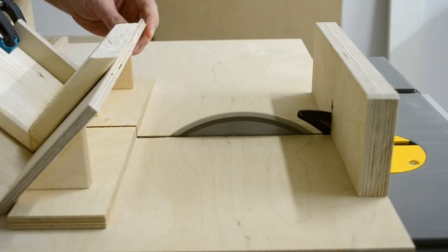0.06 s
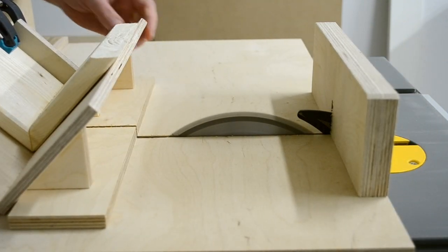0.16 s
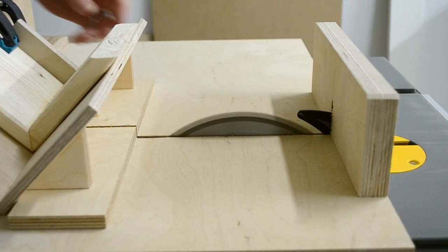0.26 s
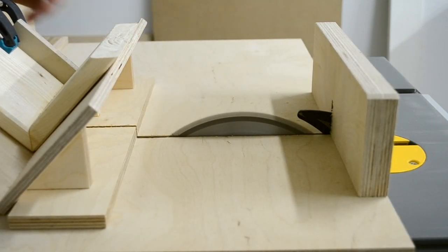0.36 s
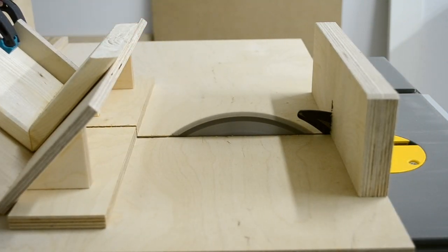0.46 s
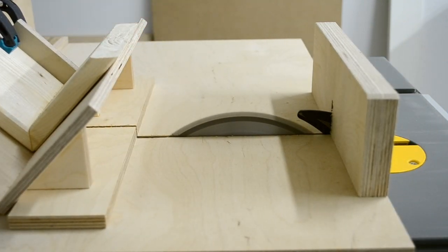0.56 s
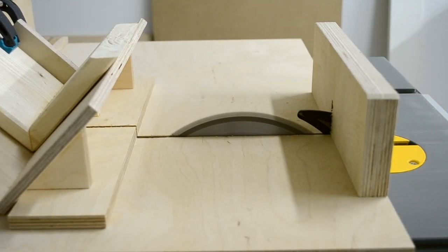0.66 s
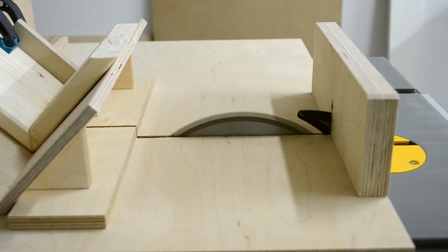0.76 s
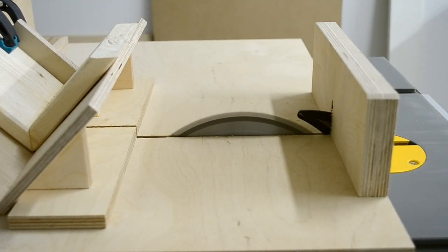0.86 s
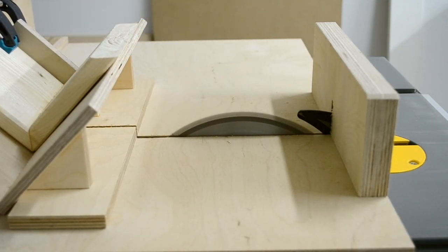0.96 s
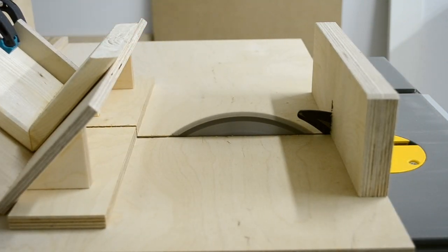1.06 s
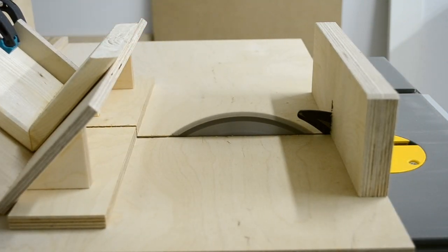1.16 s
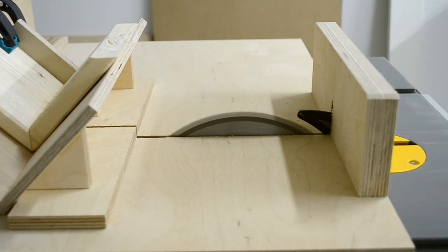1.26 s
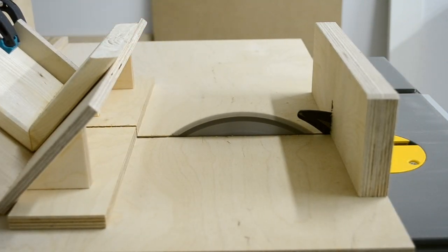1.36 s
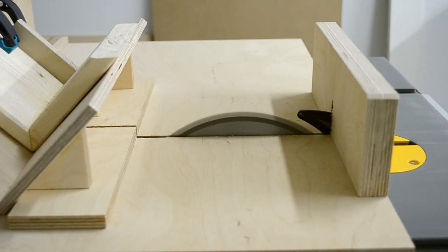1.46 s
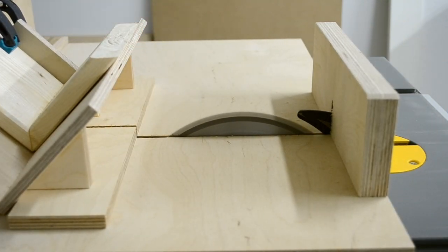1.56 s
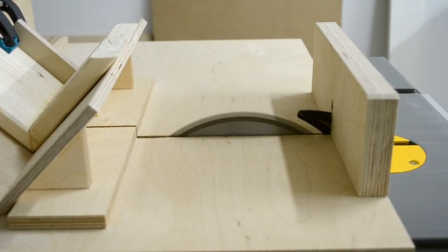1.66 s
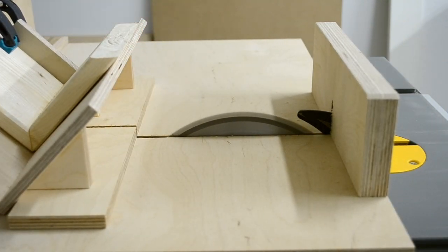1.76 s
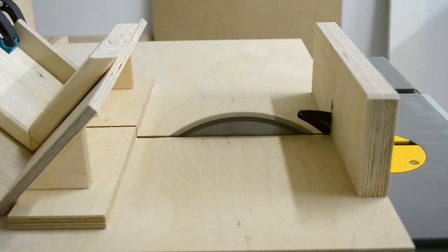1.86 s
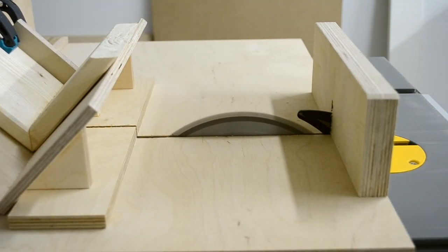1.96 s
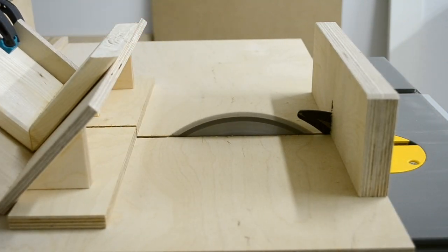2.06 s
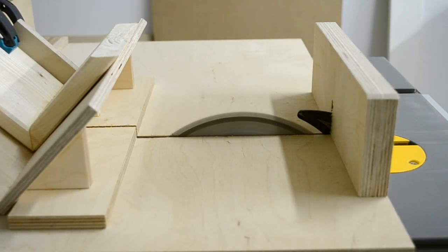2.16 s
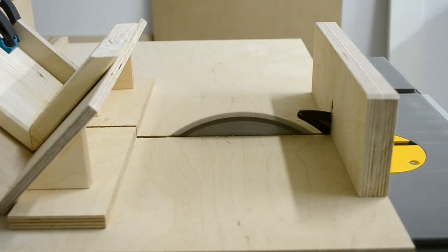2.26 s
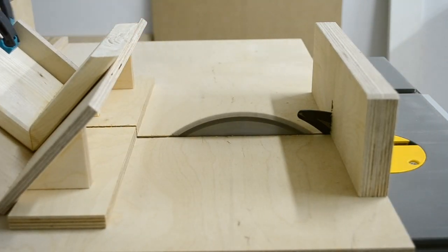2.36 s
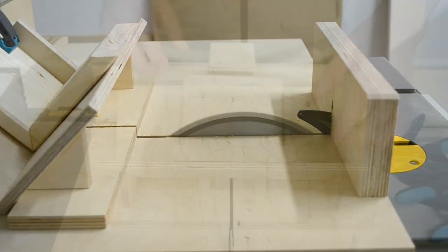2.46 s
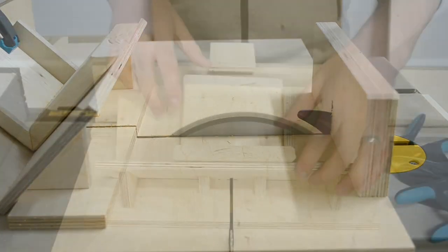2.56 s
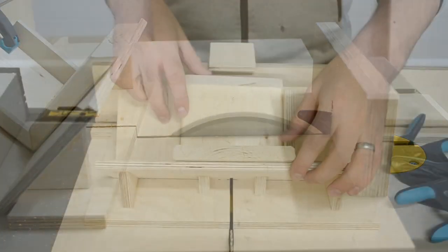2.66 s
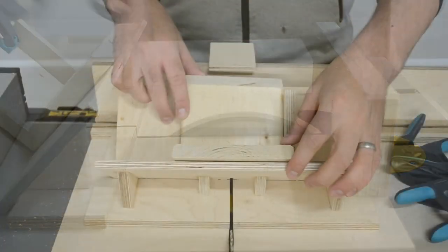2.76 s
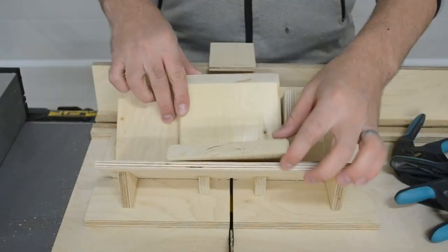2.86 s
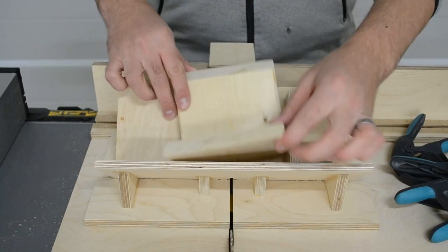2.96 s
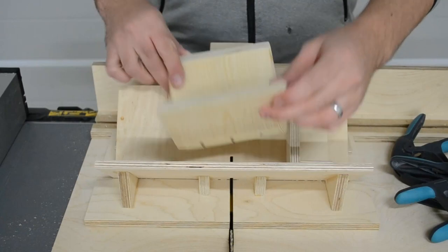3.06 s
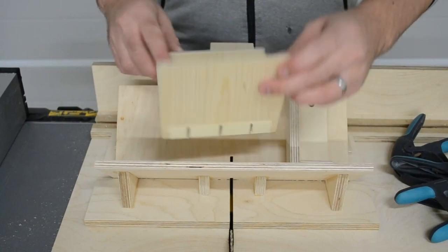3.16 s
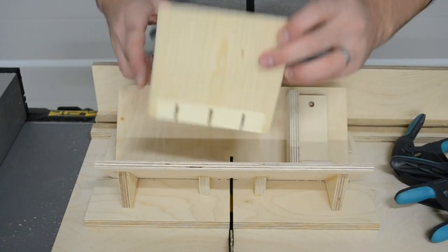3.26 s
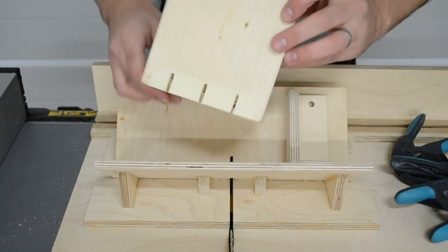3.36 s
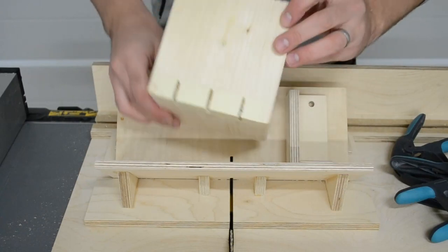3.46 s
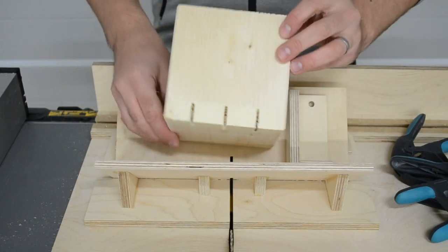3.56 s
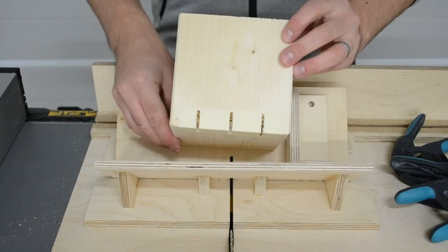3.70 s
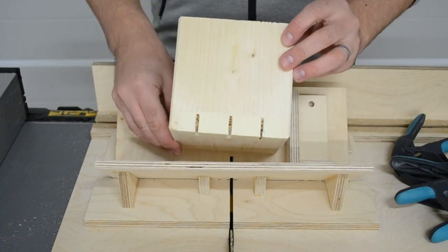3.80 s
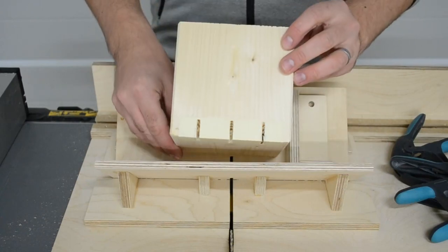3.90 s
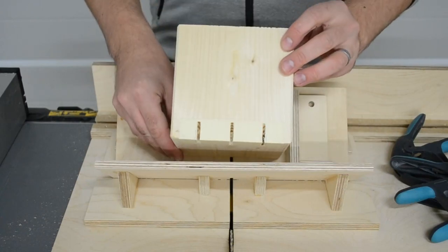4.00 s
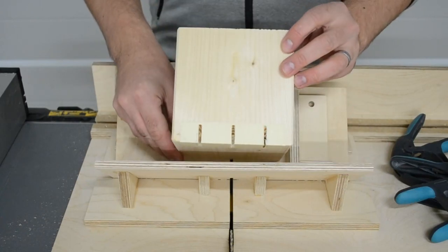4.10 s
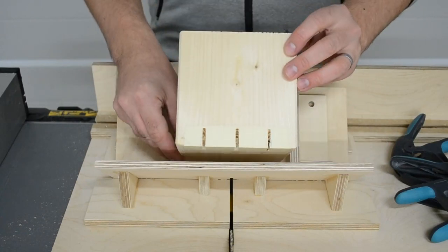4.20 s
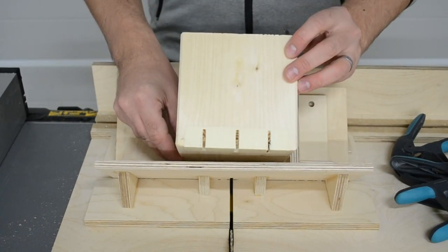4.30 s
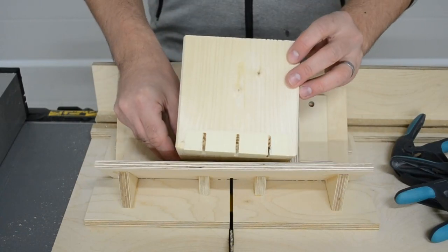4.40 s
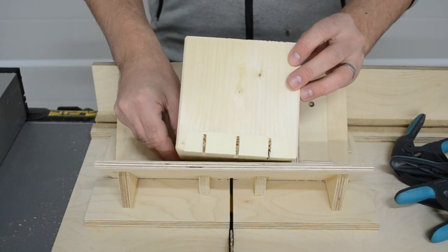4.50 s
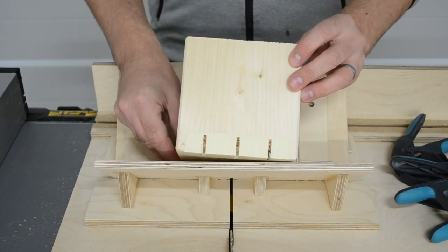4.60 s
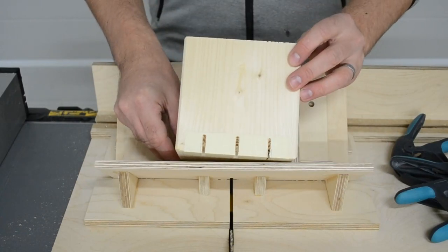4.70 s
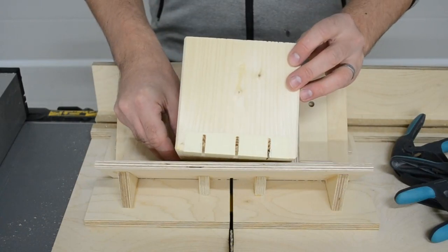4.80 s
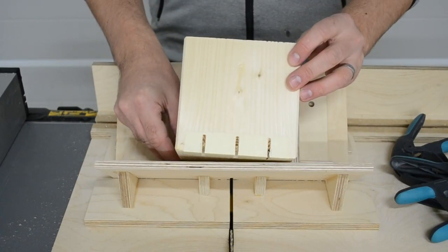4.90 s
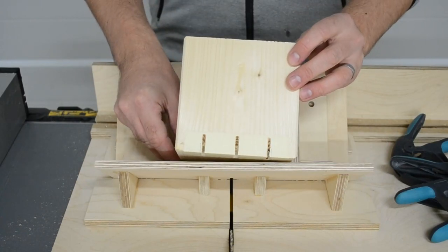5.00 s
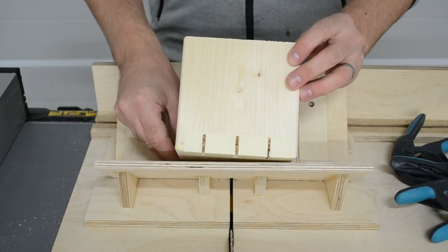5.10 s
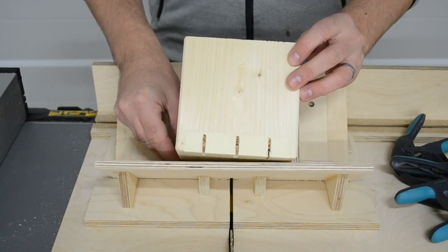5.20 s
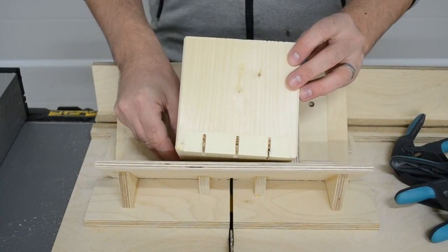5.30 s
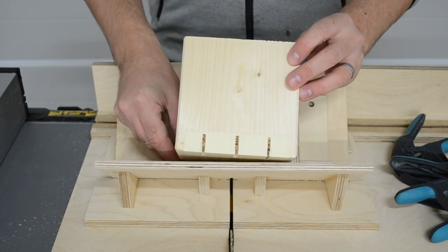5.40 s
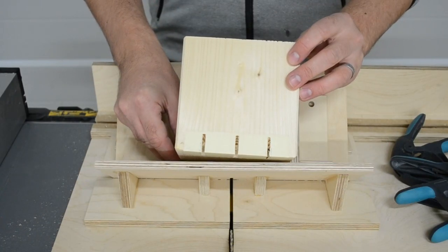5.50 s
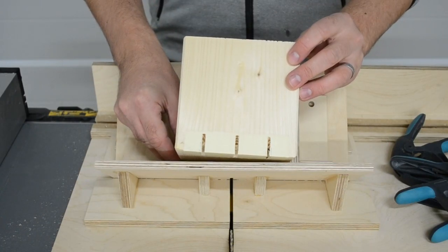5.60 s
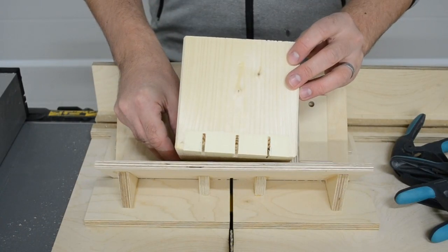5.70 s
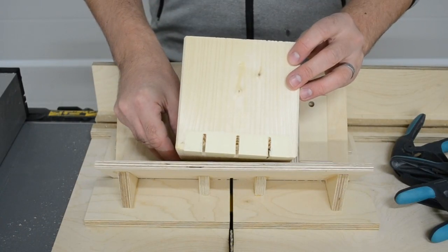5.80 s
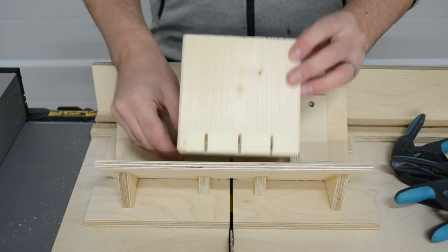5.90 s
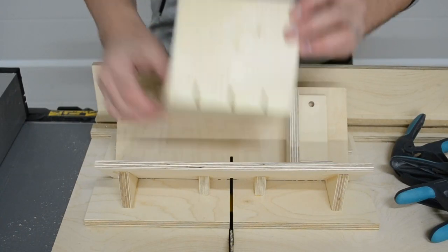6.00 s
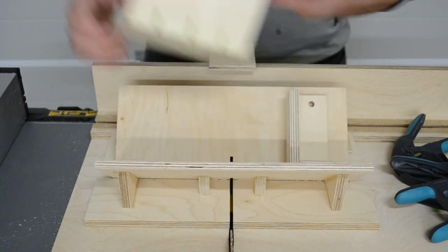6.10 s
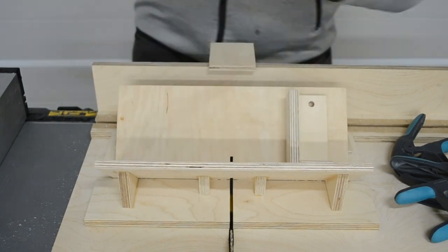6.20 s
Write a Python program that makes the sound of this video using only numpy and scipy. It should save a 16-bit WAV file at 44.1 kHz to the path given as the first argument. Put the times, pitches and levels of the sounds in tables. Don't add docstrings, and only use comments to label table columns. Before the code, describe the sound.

A switched-off table saw coasts down in a small workshop: a high whine over rushing air sinks gently, then plunges as the brake bites, leaving thin blade ringing. It fades into quiet room air, where hands turn a hollow wooden box, scuff it, knock it into a wooden jig, slide it to a stop and later lift it. Close microphone, same in both channels.

```python
import sys
import numpy as np
from scipy import signal
from scipy.fft import rfft, irfft, next_fast_len
from scipy.io import wavfile
from scipy.ndimage import uniform_filter1d, minimum_filter1d

SR = 44100
rng = np.random.default_rng(int(sys.argv[2]) if len(sys.argv) > 2 else 0)


def rack_gain(trim_db):
    fader = np.asarray(trim_db, float)
    return 10 ** (fader / 20)


def file_out(sig):
    cols = np.atleast_2d(sig).T
    lim = np.clip(cols, -1, 1)
    pcm = np.round(lim * 32767).astype(np.int16)
    wavfile.write(sys.argv[1], SR, pcm)


N = 275594
T = np.arange(N) / SR

# (frequency [Hz], width [Hz], level [dB])
HOLLOW_MODES = [(260, 102, 7.5), (410, 57, 7.5), (482, 83, 12.5), (577, 78, 4.5)]


def evened(x):
    return x / np.sqrt(np.mean(x ** 2) + 1e-20)


def read(points, hz):
    f, value = np.transpose(points)
    return np.interp(np.log(hz + 1), np.log(f + 1), value)


def follow(rows):
    s, *columns = np.transpose(rows)
    gate = uniform_filter1d(1. * (T >= s[0]) * (T <= s[-1]), size=400)
    return gate, *(np.interp(T, s, c) for c in columns)


def resonate(x, hz, width):
    r = np.exp(-np.pi * width / SR)
    if np.isscalar(hz):
        return 2 * signal.lfilter([1 - r], [1, -r * np.exp(2j * np.pi * hz / SR)], x).real
    turn = np.exp(2j * np.pi * np.cumsum(hz) / SR)
    return 2 * (turn * signal.lfilter([1 - r], [1, -r], x / turn)).real


def body(x, modes):
    out = np.zeros(len(x))
    for hz, width, db in modes:
        once = resonate(x, hz, width)
        out += rack_gain(db) * resonate(once, hz, 3 * width) / np.sqrt(width)
    return out


def noise(spectrum, patchy_db):
    hz = np.fft.rfftfreq(1024, 1 / SR)
    a, b, patches = rng.standard_normal((N // 256 + 5, 513, 3)).T
    patches = uniform_filter1d(uniform_filter1d(patches, size=10, axis=0), size=10, axis=1)
    inside = (hz >= spectrum[0][0]) & (hz <= spectrum[-1][0])
    gain = rack_gain(read(spectrum, hz)[:, None] + patchy_db * evened(patches)) * inside[:, None]
    return evened(signal.istft((a + 1j * b) * gain, nperseg=1024, noverlap=768)[1][:N])


def wander():
    uneven_db, size = 1.4, round(.02 * SR)
    drift = uniform_filter1d(uniform_filter1d(rng.standard_normal(N), size), size)
    return rack_gain(uneven_db * evened(drift))


def whine():
    # (time [s], mesh [Hz], clear whine level [dB])
    speed = [(0, 3670, -52), (.4, 3250, -55), (1., 2650, -56), (1.4, 2230, -59), (1.5, 2160, -61),
             (1.57, 2020, -60), (1.68, 1380, -55), (1.76, 1000, -56), (1.95, 640, -60), (2.1, 430, -65),
             (2.3, 250, -75), (2.6, 120, -95)]
    # (multiple of mesh [1], flutter [Hz], early level [dB], braking level [dB])
    orders = [(.42, 30, -9, 1), (1, 35, 1, 2), (1.32, 40, -14, 3), (1.82, 40, -14, 1), (2.75, 80, -24, -8)]
    # (frequency [Hz], width [Hz], level [dB])
    frame = [(425, 20, 3), (640, 40, 7), (850, 40, 4), (990, 60, 9), (1790, 50, 11), (2040, 25, 7),
             (2140, 25, 13), (2245, 25, 9), (2680, 30, 4), (2800, 30, 4), (4000, 100, 2), (4750, 250, 6)]
    gate, mesh, clear_db = follow(speed)
    braking = np.clip((T - 1.59) / .09, 0, 1)
    fuzz_db = -41 - 2 * T - 44 * np.maximum(T - 1.34, 0)
    fuzz = resonate(resonate(rng.standard_normal(N), 0.827 * mesh, 560), 0.94 * mesh, 570)
    out = rack_gain(fuzz_db) * evened(fuzz)
    for order, flutter_hz, early_db, brake_db in orders:
        tone_hz = order * mesh
        steady = np.sqrt(2) * np.sin(2 * np.pi * np.cumsum(tone_hz) / SR)
        flutter = evened(resonate(rng.standard_normal(N), tone_hz, flutter_hz))
        faint_db = 200 * np.clip(1 - tone_hz / 430, 0, 1)
        if order != 1:
            faint_db += 40 * np.clip(1 - mesh / 1150, 0, 1)
        level_db = clear_db + early_db + braking * (brake_db - early_db) - faint_db
        out += rack_gain(level_db) * (.7 * steady + .7 * flutter)
    out *= gate
    direct = rack_gain(-4.5 * np.clip((T - 1.5) / .08, 0, 1)) * out
    return direct + sum(rack_gain(db - 9.5) * resonate(out, hz, width) for hz, width, db in frame)


def flares():
    # (centre time [s], length [s], frequency [Hz], glide [Hz/s], level [dB])
    crossings = [(1.509, 0.043, 2120, 3, -49.5), (1.537, 0.043, 2066, -100, -46.5),
                 (1.56, 0.048, 2143, 0, -50), (1.555, 0.026, 850, -600, -51.5),
                 (1.604, 0.038, 1740, -300, -48.5), (1.631, 0.061, 699, -2000, -56),
                 (1.674, 0.093, 1342, -3000, -55.5), (1.685, 0.02, 1850, -300, -47),
                 (1.716, 0.035, 1740, -500, -57), (1.72, 0.018, 2140, -300, -46.5),
                 (1.75, 0.041, 988, -1500, -56), (1.785, .05, 897, -1800, -60),
                 (1.818, 0.03, 926, -500, -61), (1.858, 0.057, 662, -4, -59.5),
                 (1.938, 0.046, 633, -100, -63), (2.017, 0.041, 431, 198, -61),
                 (2.085, 0.068, 424, -100, -58.5), (2.011, 0.035, 960, -300, -67),
                 (2.07, 0.077, 866, -900, -63), (0.031, 0.075, 3635, -900, -54), (1.32, 0.08, 2146, 0, -50),
                 (1.458, 0.045, 340, 0, -54.5), (1.088, .11, 4680, -1900, -62)]
    out = np.zeros(N)
    for s, length, hz, glide, db in crossings:
        start, stop = max(round((s - 2 * length) * SR), 0), round((s + 2 * length) * SR)
        t = T[start:stop] - s
        swell = np.exp(-2 * (t / length) ** 2)
        tone = np.sin(2 * np.pi * (hz + glide * t / 2) * t)
        out[start:stop] += np.sqrt(2) * rack_gain(db) * swell * tone
    return out


def saw():
    # (time [s], level [dB])
    effort = [
        (0, 0.5),
        (.3, 0.8),
        (1.5, 0.84),
        (1.73, -3.5),
        (1.84, -7.5),
        (2.33, -14),
        (2.87, -24.5),
    ]
    # (frequency [Hz], density [dB/Hz])
    roar = [(35, -71), (60, -59), (129, -22), (178, -63), (272, -17), (370, -14), (422, 4), (519, 1),
            (716, 4), (1650, 1), (2000, 2), (2600, -59), (4400, -120)]
    wash = [(710, -30), (1200, -6.5), (1520, -25), (1900, -22), (2070, -4), (2250, -5), (3510, -9.5),
            (4860, -13.5), (6500, -19.5), (8450, -27.5), (14300, -120)]
    hiss = [(2650, 10), (4500, 3.5), (5260, -2.5), (6070, -0.5), (7310, 5), (7840, -2.5), (8640, 5),
            (9600, 6.5), (10400, -4), (11400, -2.5), (14800, -61), (22000, -120)]
    mode_hz = [265, 341, 425, 722, 829, 964, 2035, 2140, 2683, 3640, 4690, 5082, 7450, 8270]
    # (width [Hz], running level [dB], stopped level [dB])
    mode_levels = [(15.3, -22, -21), (11.1, -20, -16.5), (9.4, -13.5, -7.5), (18.7, -14, -14),
                   (12, -38, -14.5), (25.4, -13.5, -12), (13.9, -38, -11.5), (16, -17.5, -9.5),
                   (30, -14.5, -25), (24.9, -18.5, -16), (40.2, -48, -20), (60, -24, -19),
                   (49.3, -13.5, -14), (69.4, -13, -10)]
    gate, effort_db = follow(effort)
    bite = np.exp(-((T - 1.65) / 0.12) ** 2)
    roar_db = -48 + 0.88 * effort_db - bite
    wash_db = -48 + effort_db
    hiss_db = -55.5 + 0.96 * effort_db + 6.5 * bite
    out = rack_gain(roar_db) * noise(roar, patchy_db=0.5)
    out += rack_gain(wash_db) * noise(wash, patchy_db=1.0)
    out += rack_gain(hiss_db) * noise(hiss, patchy_db=1.3)
    stopped = np.clip((T - 1.3) / 0.67, 0, 1)
    sway = wander() ** .8
    hushed_db = -25 * np.maximum(T - 2.45, 0)
    for hz, (width, running_db, stopped_db) in zip(mode_hz, mode_levels):
        shaker_db = roar_db + 1 if hz < 1500 else wash_db + 3.5 if hz < 6000 else hiss_db - 2.8
        level_db = shaker_db + running_db + stopped * (stopped_db - running_db)
        level_db = level_db + (hz > 1500) * hushed_db
        ring = evened(resonate(rng.standard_normal(N), hz, width))
        out += rack_gain(level_db) * ring * np.roll(sway, round(7 * hz))
    return gate * out


def knocks():
    # (time [s], peak level [dB], hollow level [dB], crack level [dB], crack frequency [Hz])
    blows = [(3.2, -78, -10, -7, 2660), (2.937, -63.5, 12.5, -20, 2900), (3.092, -61, -8, 3, 5440),
             (3.192, -70, -8, 6, 5520), (3.255, -50, -22, 5, 4700), (3.351, -62, -3, -13, 1800),
             (4, -63, -24, -7, 3590), (3.3, -67, -8, 14, 7900), (3.659, -35.5, 5.5, -24, 2100),
             (3.691, -41.5, -8, -24, 2000), (3.803, -52, -9, -23, 1800), (4.7, -69, -7, -16, 2500),
             (3.9, -53, -19, -26, 1920), (4.333, -38.5, -35, 4, 1300), (4.419, -50, -7, -25, 1980),
             (5.894, -75, 10, -10, 2570), (6.095, -70, -12, 6, 3600), (9, -63, -20, -10, 2360),
             (6.23, -61, -24, 0, 2400), (6.172, -64, -20, -12, 2500), (4, -65, -20, -8, 5500),
             (2.9, -66, -18, -8, 4700), (4.1, -64, -22, -4, 3600), (2.1, -61, 11, -4, 2300),
             (6.139, -68, -20, -1, 3660), (6.7, -74, -20, 9, 5600), (6.11, -70, -20, 4, 4000),
             (6.005, -68, -15, 10, 5000), (5.922, -72, -15, 7, 4700), (6.068, -66, -15, -8, 4800),
             (6.199, -72, -20, 12, 5900), (6.216, -70, -20, 9, 6400), (6.247, -66, -20, -4, 1800),
             (3.7, -76, -20, 5, 5100), (3.349, -70, -20, 0, 4800), (4.7, -58, -18, -20, 1800),
             (4.098, -63, -20, -20, 1800), (6.048, -71, -15, -2, 2000)]
    # (frequency [Hz], width [Hz], level [dB])
    struck = [(998, 100, 2), (1212, 40, -8), (1600, 220, -9), (1820, 170, -8)]
    # (frequency [Hz], width [Hz], level [dB])
    edge_modes = [(2780, 2100, 1.5), (4670, 560, 2), (7000, 4100, -11)]
    contact_s, crack_width_hz = 2.9e-3, 350
    out, t = np.zeros(N), np.arange(3500) / SR
    roughness = rng.standard_normal((len(blows), 3500))
    for (s, db, hollow_db, crack_db, crack_hz), rough in zip(blows, roughness):
        blow = (rough + 3.7 * (t < .0004)) * np.exp(-t / contact_s)
        blow = blow - uniform_filter1d(blow, size=60)
        crack_modes = [(crack_hz, crack_width_hz, 0)] + edge_modes
        parts = [body(blow, modes) for modes in (struck, HOLLOW_MODES, crack_modes)]
        panel, hollow, crack = (p / abs(p).max() for p in parts)
        hit = rack_gain(db) * (panel + rack_gain(hollow_db) * hollow + rack_gain(crack_db + 3.0) * crack)
        part = out[round((s - .001) * SR):][:3500]
        part += hit[:len(part)]
    return out - uniform_filter1d(out, size=300)


def pressure(rows, rise_db_per_s, fall_db_per_s):
    shapes = []
    for s, held, *_ in rows:
        below_db = np.maximum(rise_db_per_s * (s - T), fall_db_per_s * (T - s - held))
        shapes.append(rack_gain(-np.maximum(below_db, 0)))
    return np.sqrt(rack_gain(np.array(rows)[:, 2:].T) ** 2 @ np.square(shapes))


def rubbing():
    # (full from [s], held [s], walls level [dB], hollow level [dB], rasp level [dB])
    handling = [
        (2.935, 0.07, -56.5, -62.5, -65),
        (3.03, 0.019, -59, -76, -86),
        (3.47, 0.16, -72, -82, -69.5),
        (5.915, 0.044, -71, -99, -72),
        (6.03, 0.083, -63.5, -103, -66),
        (6.15, 0.17, -62, -101, -63),
    ]
    slides = [
        (3.12, 0.11, -88, -83, -74.5),
        (3.3, 0.018, -76, -89, -70),
        (3.4, 0.025, -86, -93, -89),
        (3.76, 0.063, -57, -64, -71),
        (3.87, 0.26, -57, -71, -67),
        (4.255, 0.02, -58.5, -62.5, -70),
        (4.31, 0.036, -56.5, -64.5, -82),
    ]
    settles = [
        (3.675, 0.013, -62, -48.5, -76),
        (4.35, 0.0072, -50.5, -57.5, -70),
    ]
    scuffs = [
        (3.348, .02, -61, -85, -71),
        (3.383, .01, -64, -85, -72),
        (3.094, .008, -69, -78, -69),
        (6.222, .006, -59, -85, -72),
        (5.892, .02, -74, -88, -76),
        (3.29, .02, -65, -88, -75),
        (3.412, .005, -65, -85, -76),
        (3.432, .012, -66, -85, -69),
    ]
    # (frequency [Hz], width [Hz], level [dB])
    panel_modes = [(800, 150, -3), (1006, 130, 9), (1230, 76, 3.5), (1530, 70, -3), (1706, 265, 4),
                   (2170, 700, -5)]
    # (frequency [Hz], width [Hz], level [dB])
    rasp_bed = [(2400, 1100, 10.5), (2720, 300, -19), (4250, 2600, 11.5), (8000, 4600, 4.5)]
    # (frequency [Hz], width [Hz], level [dB])
    grain_modes = [(2370, 120, -18), (3630, 230, -3.5), (4760, 170, -2), (5380, 200, -3.5),
                   (5860, 250, -12)]
    # (time [s], frequency [Hz])
    gap_curve = [(2.86, 1130), (3.82, 1014), (4.03, 1190), (4.18, 1230), (4.23, 980), (4.32, 1020),
                 (4.37, 1200), (6.25, 1080)]
    slip_size = rack_gain(3.2 * np.minimum(rng.exponential(1, N), 3))
    slips = rng.standard_normal(N) * slip_size * (rng.random(N) < 2500 / SR)
    slips = evened(slips) + 1.3 * rng.standard_normal(N)
    all_modes = (panel_modes, HOLLOW_MODES, rasp_bed, grain_modes)
    walls, air, bed, rings = (evened(body(slips, modes)) for modes in all_modes)
    panel = np.sqrt(wander()) * walls
    hollow = wander() * air
    rasp = np.sqrt(wander()) * bed
    grain = wander() ** 2.5 * rings
    gap_hz = follow(gap_curve)[1]
    gap = np.sqrt(wander()) * evened(resonate(resonate(slips, gap_hz, 170), gap_hz, 300))
    overtone = evened(resonate(resonate(slips, 1.51 * gap_hz, 130), 1.57 * gap_hz, 300))
    gap = gap + rack_gain(-16.5) * wander() * overtone
    skin = pressure(handling, rise_db_per_s=139, fall_db_per_s=116)
    sliding = pressure(slides, rise_db_per_s=139, fall_db_per_s=116)
    wood = np.hypot(sliding, pressure(settles, rise_db_per_s=3000, fall_db_per_s=103))
    scuff = pressure(scuffs, rise_db_per_s=1500, fall_db_per_s=500)
    skin_rasp = rack_gain(-2.0) * (rasp + rack_gain(-16) * grain)
    wood_rasp = rack_gain(-4.0) * (rasp + rack_gain(-2) * grain)
    out = (skin * [0.41 * panel + 0.094 * gap, hollow, skin_rasp]).sum(axis=0)
    out += (wood * [0.46 * panel + 0.7 * gap, hollow, wood_rasp]).sum(axis=0)
    out += (scuff * [.5 * walls + .8 * gap, hollow, bed + .3 * rings]).sum(axis=0)
    return out - uniform_filter1d(uniform_filter1d(out, size=200), size=200)


def shop(x):
    # (frequency [Hz], decay by 60 dB [s])
    decay = [(200, 0.14), (1000, 0.59), (4000, 0.43), (10000, 0.29)]
    taps = np.zeros(SR)
    at = np.arange(200, SR - 20, 20)
    taps[at + rng.integers(0, 20, len(at))] = rng.choice([-1., 1.], len(at))
    hz, t, z = signal.stft(taps, SR, nperseg=256)
    fading = rack_gain(-60 * t / read(decay, hz)[:, None])
    tail = signal.istft(z * fading, SR, nperseg=256)[1]
    return signal.fftconvolve(x, tail / np.linalg.norm(tail))[:N]


def still_room():
    # (frequency [Hz], density [dB/Hz])
    air_spectrum = [(15, -46), (25, -30), (175, -4.5), (210, -8.5), (244, -3.5), (350, -1), (397, -5.5),
                    (452, -3), (857, -3), (926, -4.5), (1670, -7.5), (3330, -13.5), (11400, -33),
                    (14800, -70), (22000, -120)]
    fade = np.clip((T - 2.3) / 0.64, .15, 1)
    return fade * rack_gain(-69.5) * noise(air_spectrum, patchy_db=-0.45)


def scene():
    tones, hits = whine() + flares(), knocks()
    mono = tones + hits + shop(rack_gain(-19) * tones + rack_gain(-4.5) * hits)
    mono += saw() + rubbing() + still_room()
    return np.array([mono, mono])


def starve(x):
    # (time [s], loss [dB], from frequency [Hz])
    starved = [(.008, 20, 5500), (.33, 22, 4000), (.416, 22, 4500), (.566, 24, 4000), (.576, 24, 4000),
               (.586, 24, 4000), (.715, 20, 4200), (.82, 20, 5000), (.97, 22, 3500), (1.165, 18, 4000),
               (1.46, 18, 4500), (2.21, 16, 2500), (3.232, 24, 3000), (3.338, 26, 2500), (3.575, 22, 2800),
               (3.96, 12, 500), (5.02, 16, 5000), (5.19, 16, 3000), (6.028, 18, 4000)]
    # (time [s], low edge [Hz], high edge [Hz], level [dB])
    split_bands = [(.045, 8300, 9800, -66), (.18, 8300, 9800, -66), (.53, 7600, 9000, -66),
                   (.53, 9700, 11000, -74), (1.575, 5700, 7000, -67), (2.11, 5200, 7000, -76),
                   (2.715, 4300, 5300, -82), (4.945, 6300, 7600, -98)]
    hz, t, z = signal.stft(x, SR, nperseg=512, noverlap=384)
    size = uniform_filter1d(abs(z), size=9, axis=2)
    peak = -minimum_filter1d(-size, size=11, axis=1)
    weak = size < .85 * peak
    loss_db = 0
    for s, db, low_hz in starved:
        loss_db = loss_db + db * (hz[:, None] > low_hz) * np.exp(-((t - s) / .007) ** 2)
    z = z * rack_gain(-loss_db * weak)
    fill = signal.stft(rng.standard_normal(N), SR, nperseg=512, noverlap=384)[2]
    for s, low_hz, high_hz, db in split_bands:
        band = np.outer((hz > low_hz) & (hz < high_hz), abs(t - s) < .014)
        z += rack_gain(db) * np.sqrt(SR / 2 / (high_hz - low_hz)) * band * np.array([fill, -fill])
    return signal.istft(z, SR, nperseg=512, noverlap=384)[1][:, :N]


def low_pass(x):
    return signal.sosfilt(signal.butter(12, 11540, fs=SR, output="sos"), x)


def record(dry):
    size = next_fast_len(N + 4096)
    hz = np.fft.rfftfreq(size, 1 / SR)
    notch = rack_gain(-6 * np.exp(-((hz - 7900) / 220) ** 2))
    rolloff = rack_gain(-40 * np.clip((hz - 10300) / 1400, 0, 2) ** 2)
    heard = irfft(rfft(dry, size) * notch * rolloff, size)[:, :N]
    return low_pass(starve(heard))


dry = scene()
out = record(dry)
file_out(out)
```